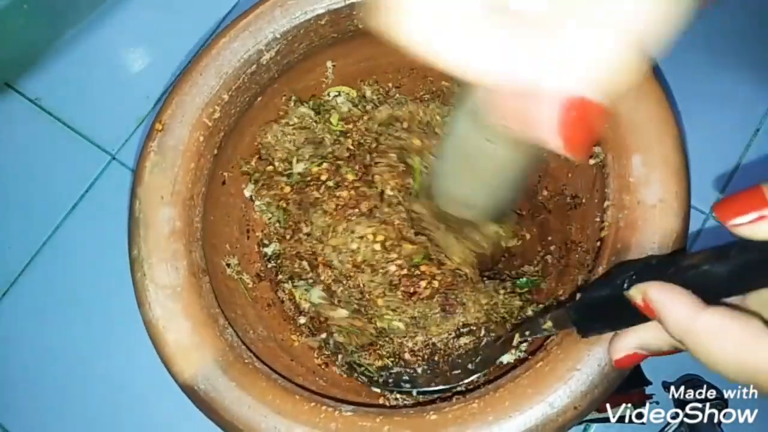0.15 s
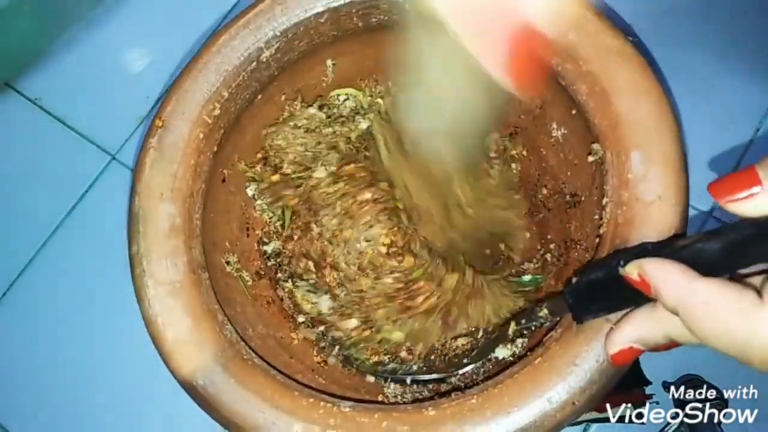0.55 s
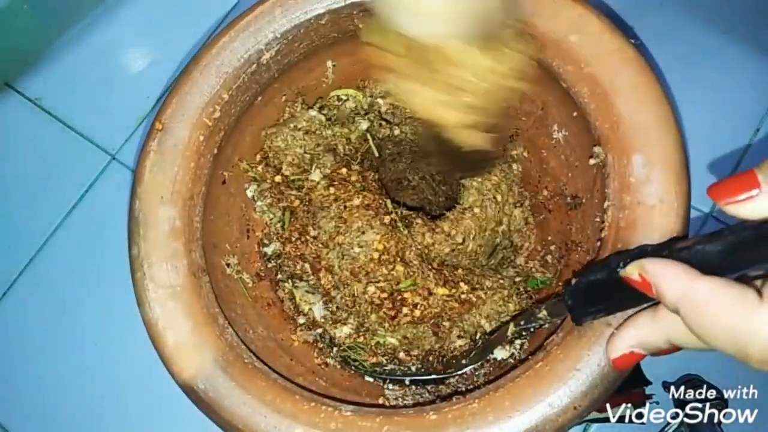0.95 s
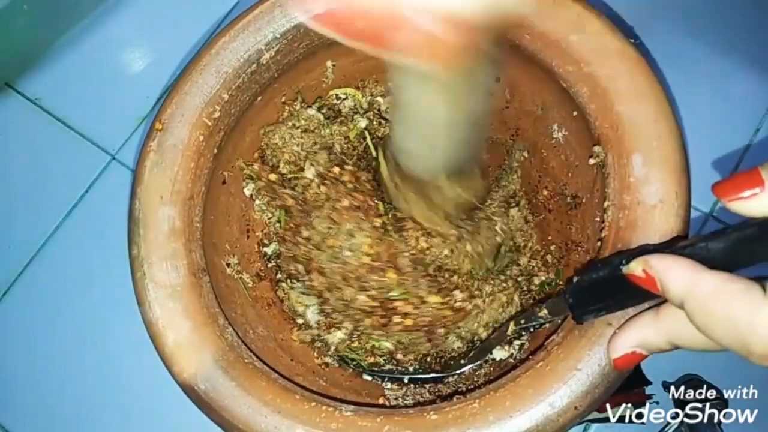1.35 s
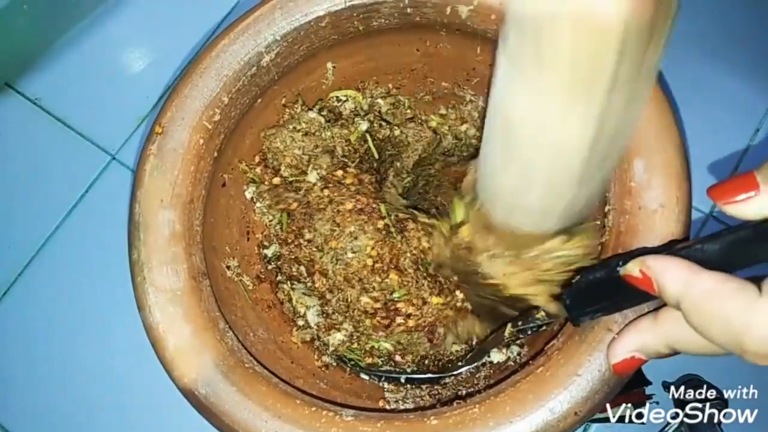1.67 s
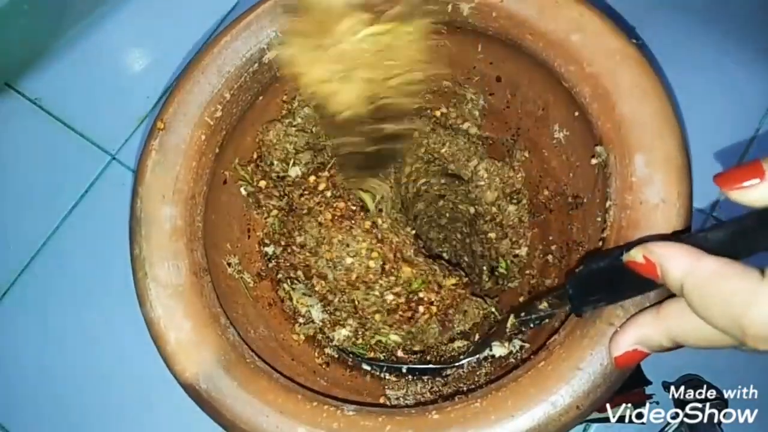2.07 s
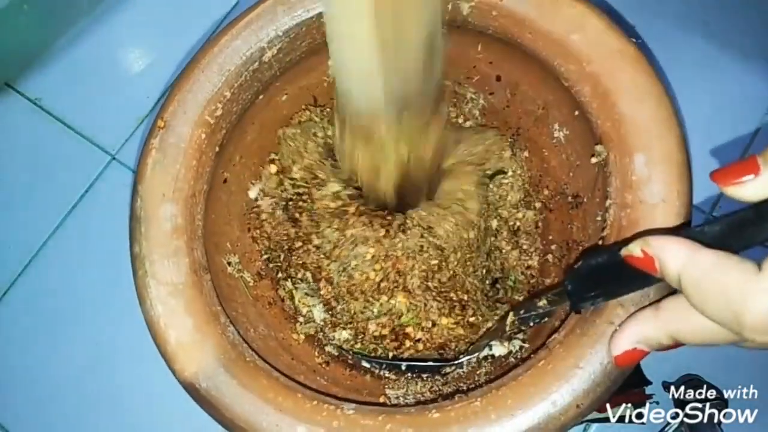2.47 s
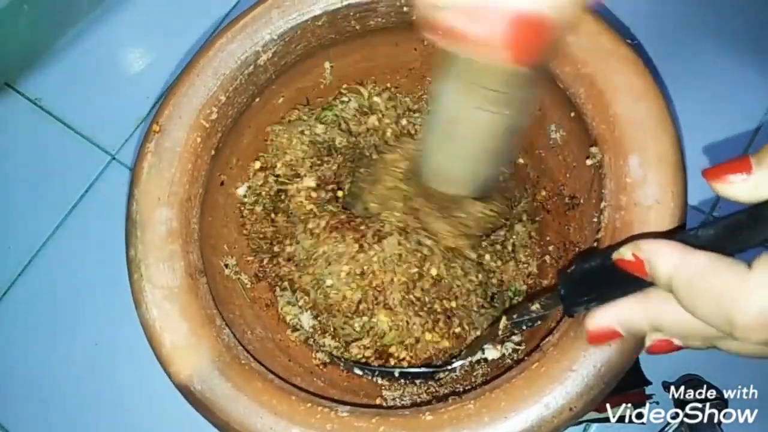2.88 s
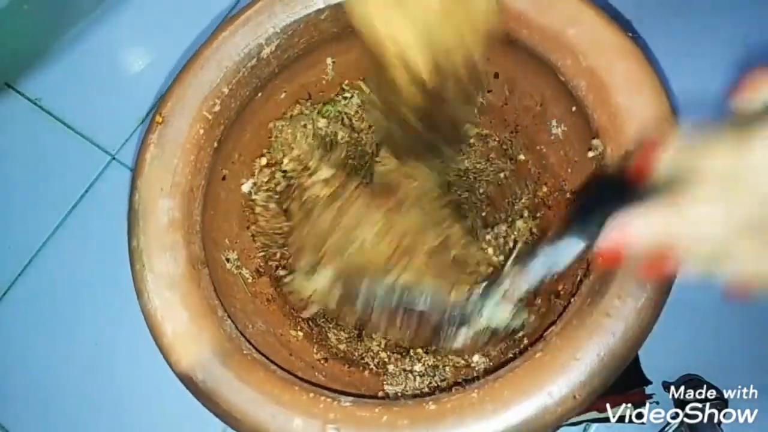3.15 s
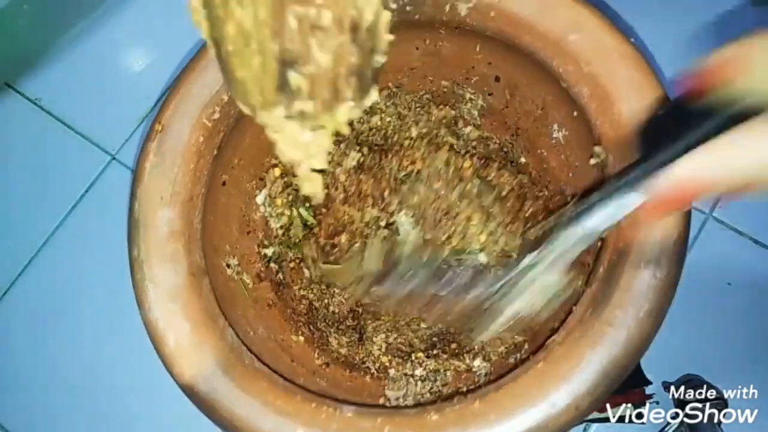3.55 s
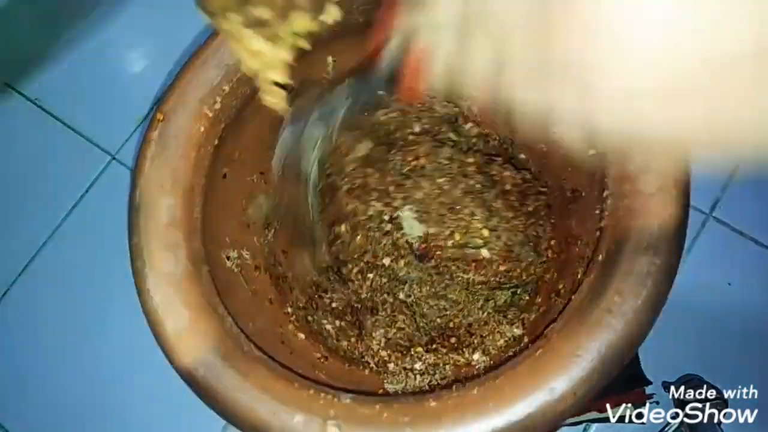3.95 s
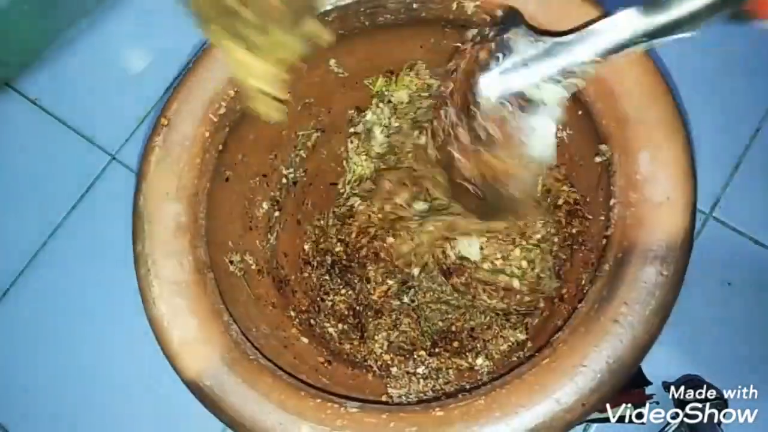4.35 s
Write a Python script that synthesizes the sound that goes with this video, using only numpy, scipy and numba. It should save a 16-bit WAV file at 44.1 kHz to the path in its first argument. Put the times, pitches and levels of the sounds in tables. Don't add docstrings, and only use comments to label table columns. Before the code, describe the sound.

Irregular hard knocks on a clay bowl with crunchy, moist crackle between them, followed by a bright steel spoon scrape, in a small hard room.

```python
import sys
import numpy as np
from scipy import signal
from scipy.fft import rfft, irfft, next_fast_len
from scipy.io import wavfile
from scipy.ndimage import uniform_filter1d
from numba import njit

SR = 44100
rng = np.random.default_rng(int(sys.argv[2]) if len(sys.argv) > 2 else 0)


def unload_wav(signal):
    wavfile.write(
        sys.argv[1],
        SR,
        np.round(np.clip(np.atleast_2d(signal).T, -1, 1) * 32767).astype(np.int16),
    )


def convert_level_to_amplitude(level_db):
    exponent = np.asarray(level_db, float) / 20
    return 10 ** exponent


N = 199396
FAST = next_fast_len(N + 1 + N % 2, True)
STEP = 8

# start_s, peak_db, deep_ring_db, main_ring_db, thud_db
BLOWS = [
    (0.066, -7.5, -23.5, -18.5, -77),
    (1.177, 3, -23, -32.5, -18.5),
    (1.466, -28, -68.5, -75, -46),
    (1.718, -3.5, -21, -17.5, -50),
    (2.821, 0, -33, -23, -19.5),
    (3.522, -23, -38.5, -37.5, -72),
    (3.538, -22.5, -55.5, -44, -74),
    (3.699, -46, -50.5, -47.5, -75),
]
# mode_hz, level_db, t60_s
BOWL_MAIN = [(908, -15.5, 0.019), (1013, -5, 0.39), (1020, -11.5, 0.15), (1120, -10.5, 0.09)]


def unit(x):
    return x / np.sqrt(np.mean(x ** 2))


def curves(table):
    s, *columns = np.transpose(table)
    t = np.arange(N) / SR
    return [np.interp(t, s, column, left=-120, right=-120) for column in columns]


def along_hz(table):
    hz, value = np.transpose(table)
    bin_hz = np.arange(FAST // 2 + 1) * SR / FAST
    return np.interp(np.log(bin_hz + 1), np.log(hz + 1), value)


def colour(x, table):
    return irfft(rfft(x, FAST) * convert_level_to_amplitude(along_hz(table)), FAST)[..., :N]


@njit
def svf(x, hz, width):
    y, b, l = np.empty(len(x)), 0., 0.
    for i in range(len(x)):
        g, k = np.tan(np.pi * hz[i] / SR), width / hz[i]
        v = (b + g * (x[i] - l)) / (1 + g * (g + k))
        b, l, y[i] = 2 * v - b, l + 2 * g * v, k * v
    return y


def band(x, hz, width_hz):
    hz = np.clip(hz + np.zeros(N), 30, 15000)
    once = svf(x, hz, 1. * width_hz)
    return svf(once, hz, 1. * width_hz)


def walk(rate):
    hold = int(SR / rate)
    steps = np.repeat(rng.standard_normal(N // hold + 1), hold)
    return unit(uniform_filter1d(uniform_filter1d(steps, hold), hold)[:N])


def ring(modes, spread, rise_s, right_turn=0):
    hz, db, t60_s = np.array(modes).T[:, :, None]
    t = np.arange(int(SR * t60_s.max())) / SR
    gain_db, turn = spread * rng.standard_normal((2, 2, len(modes), 1))
    phase = turn - np.reshape([0, right_turn], (2, 1, 1))
    decay = 1000. ** (-t / t60_s)
    waves = convert_level_to_amplitude(db + 2 * gain_db) * np.sin(2 * np.pi * hz * t + phase) * decay
    return waves.sum(axis=1) * np.minimum(t / rise_s, 1)


def add(out, s, sound):
    i = int(s * SR)
    out[:, i:i + sound.shape[1]] += sound[:, :N - i]


def grains(rate, scatter_db, likeness, tail_s):
    size_db = scatter_db * np.minimum(rng.exponential(size=N), 3.2)
    hits = (rng.random(N) < rate / SR) * convert_level_to_amplitude(size_db)
    pole = np.exp(-1 / (tail_s * SR))
    bursts = signal.lfilter([1], [1, -2 * pole, pole ** 2], hits)
    share, noise = np.clip(likeness, 0, 1), rng.standard_normal((3, N))
    return bursts * (np.sqrt(share) * noise[0] + np.sqrt(1 - share) * noise[1:])


def stroke(s, db, rise, fall, hold=0., sag=0., start=0.):
    t = np.arange(0, N, STEP) / SR - s
    rising = rise * np.minimum(t, 0)
    sagging = sag * np.clip(t, 0, hold)
    falling = fall * np.maximum(t - hold, 0)
    level_db = db + rising - sagging - falling
    return np.where(t + s < start, -120, np.maximum(level_db, -120))


def background():
    # centre_hz, likeness_0_to_1
    alike = [(60, 1), (130, 1), (280, 0.84), (620, 0.38), (1350, 0.08), (2940, 0), (6400, 0.6),
             (13900, 0.06)]
    # centre_hz, density_db_per_hz
    air = [(20, 0.5), (45, -4), (70, 1), (100, -12.5), (160, -9), (240, -39), (310, -12), (370, -23),
           (700, -18.5), (1500, -26.5), (3200, -25.5), (4500, -24), (7200, -39.5), (11500, -42.5),
           (14400, -70.5)]
    # time_s, level_db
    traffic = [
        (0, -51),
        (1.0, -46),
        (2.0, -54.5),
        (2.9, -49),
        (3.6, -56.5),
        (4.52, -62),
    ]
    # peak_s, level_db
    swells = [
        (0.16, -53.5),
        (0.629, -56.5),
        (1.34, -52.5),
        (1.74, -56.5),
        (4.39, -52.5),
    ]
    mid, side = rfft(rng.standard_normal((2, FAST)))
    like = np.clip(along_hz(alike), 0, 1)
    pair = np.sqrt(1 + like) * mid + np.array([[1], [-1]]) * np.sqrt(1 - like) * side
    hiss = unit(irfft(pair * convert_level_to_amplitude(along_hz(air)), FAST)[:, :N]) * convert_level_to_amplitude(-59.5 + .6 * walk(5.8))
    deep_db = curves(traffic)[0] + 0.68 * walk(6)
    swell_db_s, floor_db = 50, -65
    motor_db = np.max([stroke(s, db, swell_db_s, swell_db_s) for s, db in swells], axis=0)
    drone_db = motor_db.clip(floor_db).repeat(STEP)[:N]
    noise = rng.standard_normal((3, N))
    noise = noise[0] + 0.35 * noise[1:]
    deep = unit(np.array([band(v, 52.9, 35) for v in noise])) * convert_level_to_amplitude(deep_db - 5.0)
    drone = unit(np.array([band(v, 134.2, 35) for v in noise])) * convert_level_to_amplitude(drone_db - 1.0)
    return hiss + deep + drone


def groan():
    # time_s, level_db
    rocking = [
        (1.29, -68),
        (1.314, -47),
        (1.378, -47),
        (1.5, -56.5),
    ]
    # start_s, level_db
    thumps = [
        (1.177, -41),
    ]
    t = np.arange(N) / SR
    tones = np.sin(2 * np.pi * 200 * t)
    tones = tones + 0.81 * np.sin(2 * np.pi * 228 * t)
    tones = tones + 0.42 * np.sin(2 * np.pi * 325 * t)
    rough = np.array([unit(band(v, 354, 200)) for v in rng.standard_normal((2, N))])
    out = (tones * convert_level_to_amplitude(2.43 * walk(39.8)) + .5 * rough) * convert_level_to_amplitude(curves(rocking)[0] - 3.5)
    floor_modes = [(40.4, -4.0, .09), (88.8, -8.0, 0.041), (171.3, -19.5, 0.0503)]  # Hz, dB, t60 s
    for s, db in thumps:
        add(out, s, convert_level_to_amplitude(db) * ring(floor_modes, 0.26, 0.0025))
    return out


def spoon():
    # start_s, peak_db
    catches = [
        (3.91, -10.5),
        (3.947, -24),
        (3.963, -21),
        (3.9999, -19),
        (4.0078, -22.5),
        (4.0454, -35),
        (4.0555, -16),
    ]
    # mode_hz, level_db, t60_s
    steel = [(2100, -18, .04), (3435, -13, .05), (4517, 0, .05), (4748, -2, .05), (5420, -3, .04),
             (5900, -10, .025), (10990, -25, .04)]
    # time_s, level_db
    drag = [
        (3.94, -45),
        (3.95, -38.5),
        (4.062, -38.5),
        (4.08, -61),
        (4.1, -59),
    ]
    out = np.zeros((2, N))
    for s, peak_db in catches:
        add(out, s, convert_level_to_amplitude(peak_db - 9.0) * ring(steel, 1.0, 0.0014))
    body = convert_level_to_amplitude(-12.5) * ring(BOWL_MAIN, .3, 0.0011)
    add(body, 0, ring(steel, 0.85, .001))
    slips = grains(400, 2.3, 0.87, 0.00012)
    chatter = unit(signal.fftconvolve(slips, body, axes=1)[:, :N])
    return out + chatter * convert_level_to_amplitude(curves(drag)[0] - 8.5)


def ticks():
    # start_s, peak_db
    clicks = [
        (0.0655, -47),
        (1.1777, -40.5),
        (1.7175, -48),
        (2.804, -49.5),
        (2.823, -50),
        (3.3319, -43.5),
        (3.91, -34),
    ]
    modes = [(4890, 1.5, .006), (6510, -3, .006), (7800, 1, 0.004124), (9400, -3.0, 0.0054),
             (11640, -3.0, 0.0066), (12870, -9.0, .005), (14200, -3.0, .004)]
    out = np.zeros((2, N))
    for s, peak_db in clicks:
        add(out, s, convert_level_to_amplitude(peak_db + 7) * ring(modes, 0.82, 0.00032))
    return out


def snaps():
    # start_s, peak_db, left_minus_right_db
    seeds = [(0.2, -4, 2), (0.239, -11.5, 7.5), (0.329, -41, 3.5), (0.373, -24, 7.5), (0.732, -21, 18),
             (0.759, -9.5, 11), (0.864, -31.5, -5), (1.33, -4, -4), (1.823, -18, -30), (1.951, -21, 5),
             (1.98, -19, 9), (2.001, -18, -14), (2.041, -25, -21.5), (2.117, -22, -8), (2.263, -60, -8),
             (2.29, -42.5, -2), (2.386, -30, -4), (2.553, -34.5, 5), (2.626, -22, -1), (2.88, -9.5, 1),
             (3.085, -22, -5), (3.119, -15.5, -4), (3.155, -25, 9), (3.333, -35, -4.5), (3.446, -42, 7.5),
             (3.704, -17.5, -2.5), (4.326, -44, 5)]
    # start_s, peak_db, left_minus_right_db, pitch_hz
    pops = [(0.142, -18, 15, 1000), (0.757, -13, 6, 600), (3.523, -9.5, -8, 962), (1.787, -21, -13, 990),
            (1.857, -9.5, 8, 590), (2.409, -25.5, 3, 1206), (2.555, -32, 8, 786), (2.97, -6.5, 6, 618),
            (2.973, -12.5, 0, 1900)]
    out = np.zeros((2, N))
    seeds_hz = 4420 * (1 + 0.053 * rng.standard_normal(len(seeds)))
    pitched_seeds = [(*row, hz) for row, hz in zip(seeds, seeds_hz)]
    for s, peak_db, pan_db, hz in pitched_seeds + pops:
        modes = [(hz, 0, .02), (0.86 * hz, -3, .02), (4400, -6, .015), (1900, -10, .012),
                 (6000, -14, .01), (11500, -30, .008)]
        port_db = np.array([[.4], [-.4]]) * pan_db
        add(out, s, convert_level_to_amplitude(peak_db - 7.5 + port_db) * ring(modes, 1.2, 0.0035))
    return out


def landing(s):
    return max([0.] + [blow[0] for blow in BLOWS if .05 < s - blow[0] < .2])


def effort():
    # bottom_s, crackle_db, swell_db_per_s, body_db, hollow_db (both re crackle)
    presses = [(0.205, -26.5, 136, -6, -6), (0.233, -33, 200, -5.5, -1.5), (0.74, -34, 291, -6, -3),
               (0.758, -28.5, 500, -9, -0.5), (1.33, -27.5, 145, -9.5, -7), (1.864, -33.5, 50, -7.5, 1),
               (2.438, -40, 183, -11, -16), (2.56, -54, 397, -8.5, 0), (2.63, -43.5, 134, -24, -14),
               (2.973, -33, 87, -3.5, 3), (3.539, -42, 507, -10.5, 0.5), (3.704, -38.5, 598, -15.5, -12.5),
               (3.89, -61, 150.5, -29, -24), (3.915, -31.5, 2500, -17, -26.5), (4.35, -52, 201, -33.5, -33)]
    # start_s, length_s, crackle_db, body_db, hollow_db (both re crackle)
    lifts = [(0.328, 0.098, -38.5, -10, -12.5), (0.355, 0.022, -44, -5, -1.5), (0.866, 0.069, -43, -8, -8),
             (1.472, 0.024, -30.5, -11, -17.5), (1.51, 0.06, -45, -12, -7.5),
             (1.974, 0.145, -39.5, -5.5, -15.5), (2.27, 0.04, -62.5, -24, -20),
             (2.396, 0.099, -52.5, -8, 6), (3.014, 0.071, -55.5, -8, 3), (3.095, 0.13, -39, -6, -7),
             (3.246, 0.21, -54.5, -11.5, -15), (3.958, 0.095, -30.5, -19.5, -38),
             (4.07, 0.098, -54, -3, -16), (4.376, 0.1, -55, -26, -23)]
    # crackle, body, hollow
    # sag during a lift [dB/s]
    sags_db_s = [42.5, 197, 37]
    sprays_db, spray_falls_db_s = [-33.5, -34, -25], [205.5, 188, 153]
    swell_shares = [1, 1.74, 1.2]
    settle_shares = [1, 1.32, 0.76]
    settle_db_s, lift_rise_db_s = 341, 1300
    layers = []
    for k, (sag, spray_db, spray_fall) in enumerate(zip(sags_db_s, sprays_db, spray_falls_db_s)):
        settle = settle_db_s * settle_shares[k]
        gestures = []
        for s, db, rise, *share_db in presses:
            level_db = db + (0, *share_db)[k]
            gestures.append(stroke(s, level_db, rise * swell_shares[k], settle, start=landing(s)))
        for s, hold, db, *share_db in lifts:
            level_db = db + (0, *share_db)[k]
            gestures.append(stroke(s, level_db, lift_rise_db_s, settle, hold, sag))
        for s, db, *_ in BLOWS:
            gestures.append(stroke(s, db + spray_db, 0, spray_fall, start=s))
        layers.append(np.repeat(np.max(gestures, axis=0), STEP)[:N])
    return layers


def pocket_hz():
    # start_s, opening_hz
    pockets = [
        (0.36, 880),
        (0.72, 1176),
        (0.87, 900),
        (1.47, 1094),
        (1.981, 1400),
        (2.385, 1563),
        (2.551, 900),
        (3.087, 1590),
        (3.91, 1000),
    ]
    low_hz, blow_hz, blow_sink_s, open_sink_s = 590, 900, 0.066, 0.061
    t, hz = np.arange(N) / SR, np.full(N, 1. * blow_hz)
    opens = [(row[0], blow_hz, blow_sink_s) for row in BLOWS]
    opens += [(s, top_hz, open_sink_s) for s, top_hz in pockets]
    for s, top_hz, sink_s in sorted(opens):
        sinking_hz = low_hz + (top_hz - low_hz) * np.exp(-np.abs(t - s) / sink_s)
        hz = np.where(t < s, hz, sinking_hz)
    return hz


def paste():
    # centre_hz, density_db_per_hz
    grit = [(1200, -32.5), (2200, -33), (3000, -18), (3600, -15), (4100, -6), (4600, -4), (5100, -11.5),
            (5700, -14), (6500, -15.5), (7400, -22), (9500, -28), (13000, -37)]
    # centre_hz, density_db_per_hz
    dust = [(6000, -43.5), (7500, -8), (9300, -12), (10500, -10.5), (11600, -7.5), (12500, -12.5),
            (13300, -17.5), (14400, -45)]
    crackle_db, body_db, hollow_db = effort()
    load = convert_level_to_amplitude(0.83 * walk(50))
    sharp = grains(1100, 2.8, .4, .0007)
    crackle = unit(np.array([colour(g, grit) for g in sharp])) * convert_level_to_amplitude(crackle_db)
    dull = grains(800, 2.8, .6, .0009)
    body = unit(np.array([band(g, 1885, 2100) for g in dull]))
    body = body * convert_level_to_amplitude(body_db + 3.0 + 2.21 * walk(39.74))
    hollow = unit(np.array([band(g, pocket_hz(), 480) for g in dull]))
    hollow = hollow * convert_level_to_amplitude(hollow_db - 4.0 + 1.5 * walk(29.98))
    squash = unit(np.array([band(g, 337, 160) for g in dull])) * convert_level_to_amplitude(hollow_db - 14.5)
    fine = grains(1300, 2.06, 0.091, 0.00075)
    sheen = unit(np.array([colour(g, dust) for g in fine])) * convert_level_to_amplitude(0.6 * crackle_db - 32.0)
    return load * (crackle + body + hollow + squash) + sheen


def blows():
    # mode_hz, level_db, t60_s
    deep_modes = [(562, -19, 0.35), (687, 0.5, 0.051), (790.3, 3.5, 0.083)]
    # mode_hz, level_db, t60_s
    thud_modes = [(1346, -6, .05), (1580, -5, .04), (1780, -3, .06), (1857, 0, .07), (1927, -2, .07),
                  (2196, -8, .04)]
    # mode_hz, level_db, t60_s
    high_modes = [(2420, -9.5, 0.024), (2590, 7.5, 0.19), (2610, 7, .2), (2837, -2, 0.056), (2940, 7, .07),
                  (3190, -3, 0.044), (3230, 5, 0.048), (3410, 0.5, 0.0392)]
    # mode_hz, level_db, t60_s
    crack_modes = [(4052, 4.5, 0.022), (4200, -8, 0.071), (4698, -8.5, 0.08), (4730, -13, 0.024)]
    knock_modes = [(365, -21.5, 0.019), (1000, 0, 0.01026), (1718, 2.5, 0.008), (2410, -4.5, 0.0065),
                   (3590, -18.0, .012), (11150, -38, 0.024)]
    families = (deep_modes, BOWL_MAIN, thud_modes, high_modes)
    turns_rad = (.5, 1.2, .2, -.3)
    spoon_from_s, steel_db = 3.2, 6.5
    out = np.zeros((2, N))
    for s, peak_db, *family_db in BLOWS:
        high_db = peak_db - 33.5 + steel_db * (s > spoon_from_s)
        for db, modes, turn in zip((*family_db, high_db), families, turns_rad):
            add(out, s, convert_level_to_amplitude(db + 2) * ring(modes, .3, .0015, turn))
        add(out, s, convert_level_to_amplitude(peak_db - 6.5) * ring(knock_modes, 0.23, 0.0017))
        add(out, s + .002, convert_level_to_amplitude(peak_db - 14.5) * ring(crack_modes, 0.27, 0.0038))
    return out


def room(x):
    t60_s, first_echo_s = .22, .002
    t = np.arange(SR // 2) / SR
    echo = rng.standard_normal((2, len(t))) * 1000. ** (-t / t60_s) * (t > first_echo_s)
    echo = echo / np.sqrt(np.sum(echo ** 2, axis=1, keepdims=True))
    return signal.fftconvolve(x.mean(axis=0, keepdims=True), echo, axes=1)[:, :N]


def scene():
    # centre_hz, gain_db
    port = [(150, -10.5), (400, 0), (700, 1), (5500, 1.5), (7000, -8), (9000, -11.5), (11500, -4),
            (14000, -12.5)]
    right_lag_s, right_db, room_db = .00009, -2.5, -7
    bowl, contents = blows(), paste() + snaps() + ticks() + spoon()
    near = bowl + contents + convert_level_to_amplitude(room_db) * room(contents + .45 * bowl)
    lag = np.exp(-2j * np.pi * np.arange(FAST // 2 + 1) * SR / FAST * right_lag_s)
    left = near[0] * convert_level_to_amplitude(-right_db / 2)
    right = irfft(rfft(near[1], FAST) * lag, FAST)[:N] * convert_level_to_amplitude(right_db / 2)
    return np.array([colour(v, port) for v in (left, right)]) + groan() + background()


def thin_treble(x, from_hz, under_db, quiet_db, patchy_db):
    hz, _, z = signal.stft(x, SR, nperseg=1024)
    bands = z[:, :512].reshape(2, 64, 8, -1)
    db = 10 * np.log10(np.mean(np.abs(bands) ** 2, axis=(0, 2)) + 1e-20)
    patches = 2 * uniform_filter1d(rng.standard_normal(db.shape), size=4, axis=1)
    top_db = db[2:].max(axis=0)
    attack = np.diff(top_db, prepend=0) > 14
    loud_enough = db > np.maximum(top_db - under_db, quiet_db) + patchy_db * patches
    keep = loud_enough | (hz[4:512:8, None] < from_hz) | attack
    z[:, :512] *= np.repeat(np.where(keep, 1, .01), 8, axis=0)
    return signal.istft(z, SR, nperseg=1024)[1][:, :N]


def top_cut(x):
    return signal.sosfilt(signal.butter(12, 14540, fs=SR, output="sos"), x)


def record(dry):
    rounded = .9 * np.tanh(dry / .9)
    mix = thin_treble(rounded, from_hz=6900, under_db=37, quiet_db=-100, patchy_db=7)
    return top_cut(mix)


dry = scene()
out = record(dry)
unload_wav(out)
```